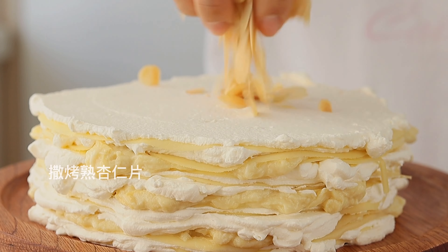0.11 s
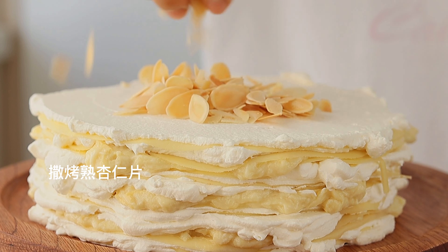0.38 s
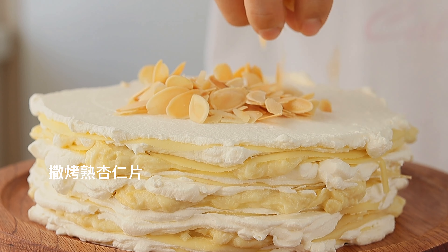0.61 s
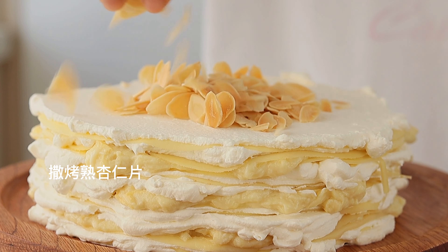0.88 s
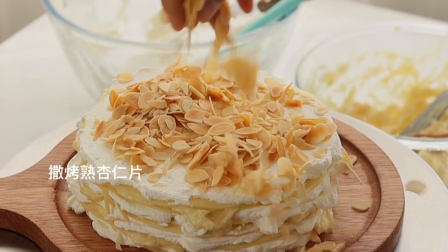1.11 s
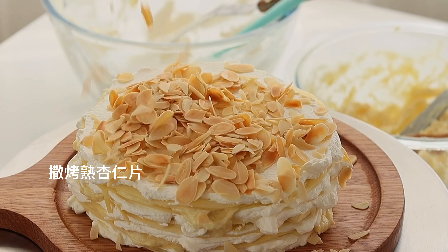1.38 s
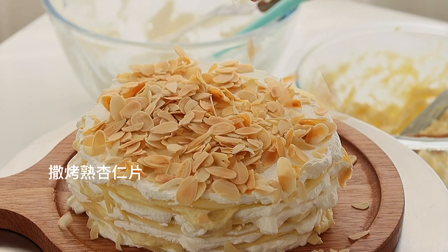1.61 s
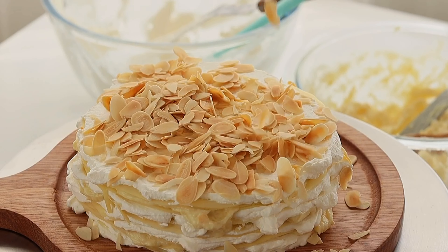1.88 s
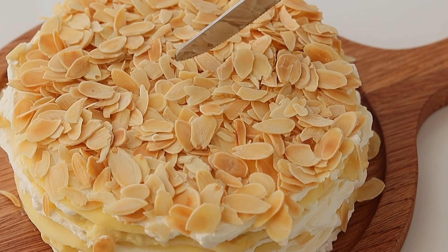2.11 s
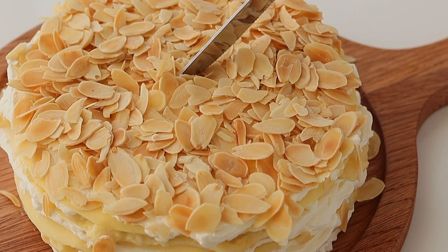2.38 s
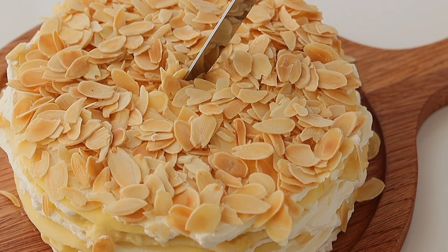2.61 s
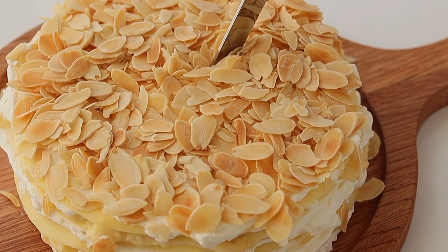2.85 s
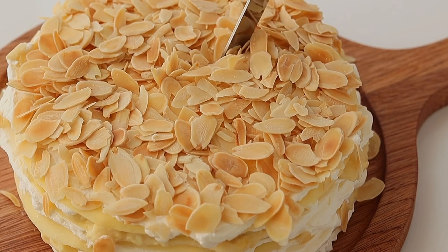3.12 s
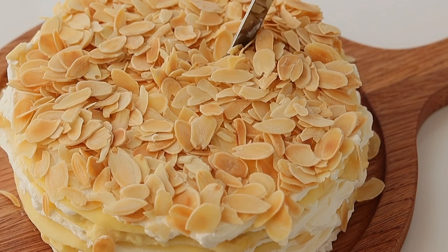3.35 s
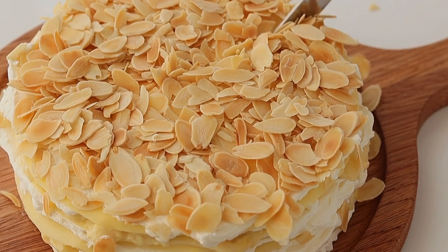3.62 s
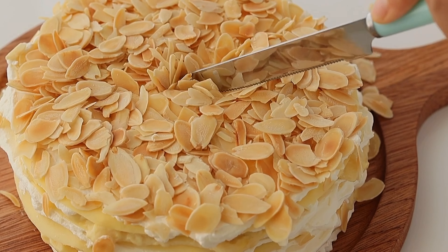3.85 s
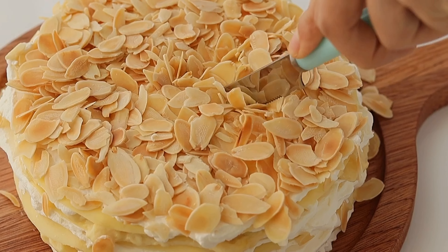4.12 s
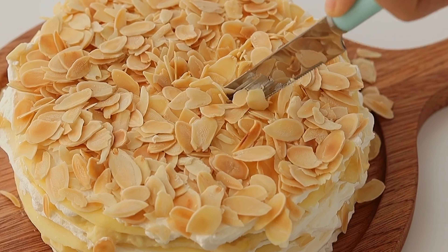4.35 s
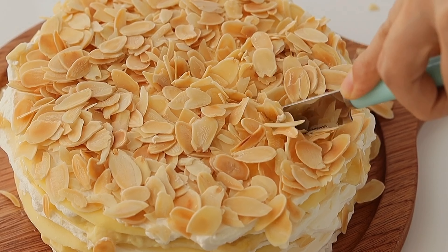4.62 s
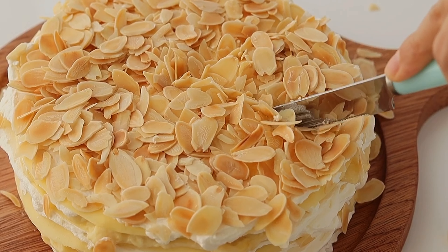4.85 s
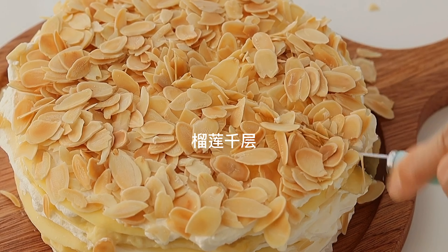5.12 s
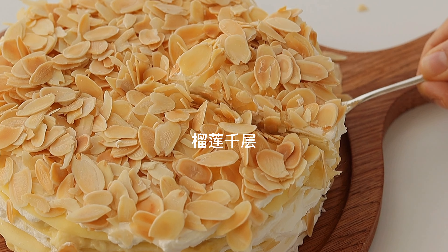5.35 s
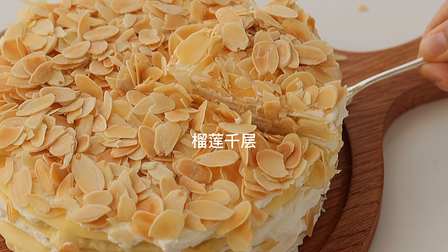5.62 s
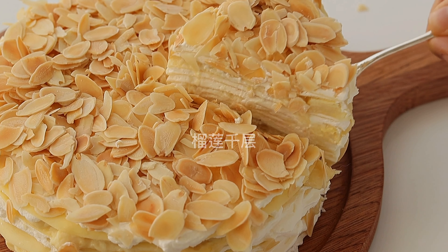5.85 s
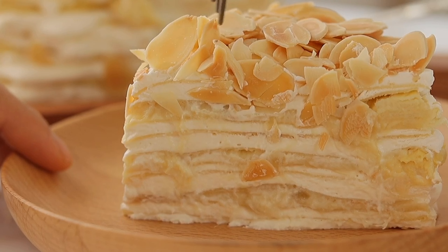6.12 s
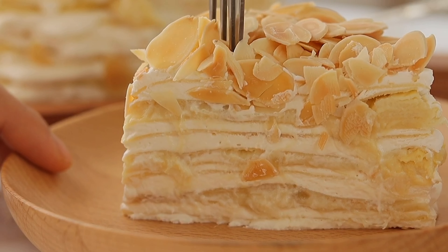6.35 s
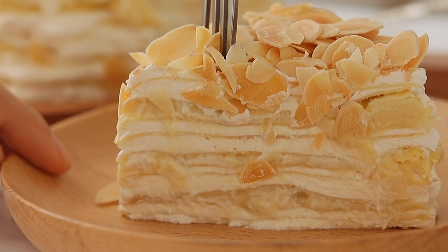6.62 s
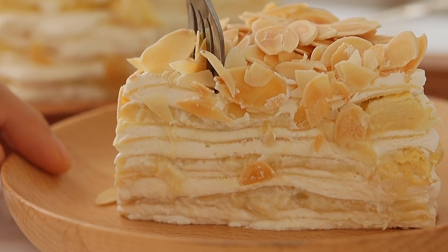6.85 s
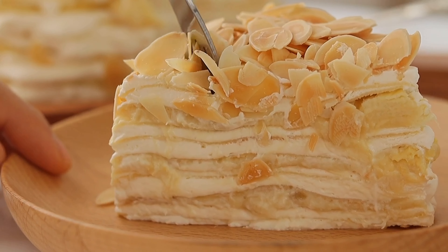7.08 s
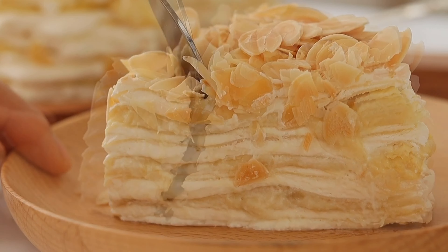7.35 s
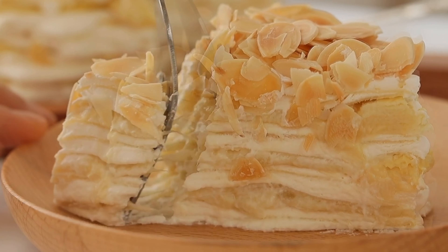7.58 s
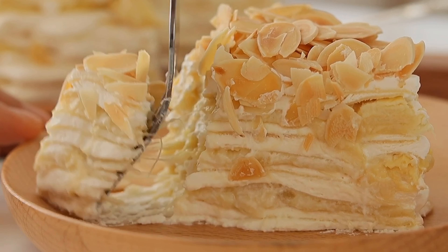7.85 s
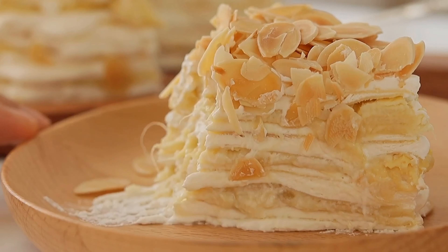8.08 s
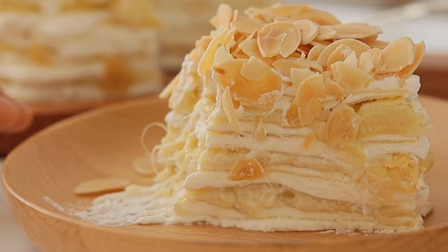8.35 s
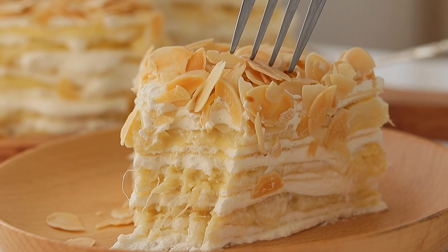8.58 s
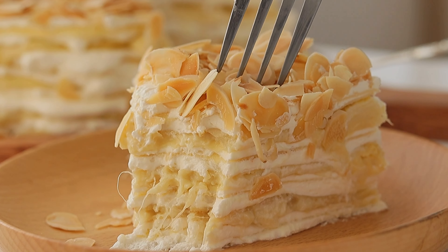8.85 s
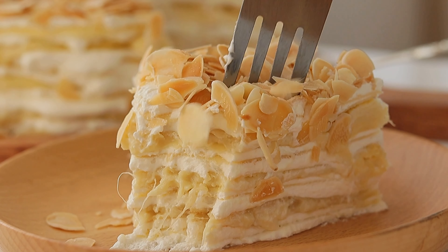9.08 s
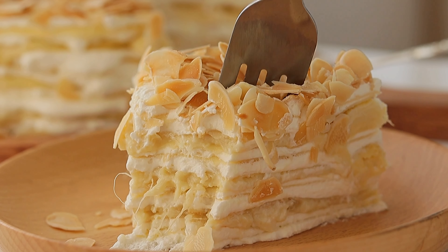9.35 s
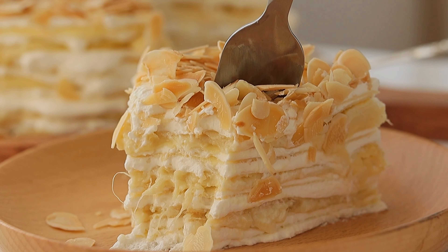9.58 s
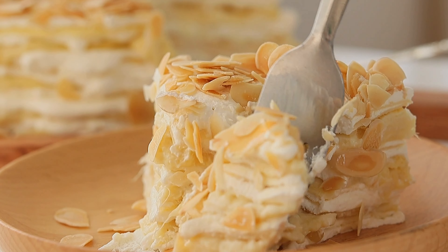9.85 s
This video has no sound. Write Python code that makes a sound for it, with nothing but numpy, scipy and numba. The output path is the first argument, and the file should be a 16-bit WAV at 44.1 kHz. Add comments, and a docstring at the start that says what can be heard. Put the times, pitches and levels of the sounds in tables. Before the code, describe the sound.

A small quiet kitchen, heard very close, with faint hiss and low hum. From 0.2 to 0.9 s a handful of toasted almond flakes patters onto a cream cake, dry and papery, with a light glass ting near 0.6. From 1.1 to 1.9 s a fuller shower crackles densely, with more body and another tiny ting near 1.45; a split-second dropout occurs at 1.1. A knife gives sparse snaps from 2.4, then crisp crunches that peak at 4.0-4.7, over soft low pressing rumbles, ending in a dull tap at 5.0 and small crumbles. Near quiet from 5.3 to 6.4, with a barely audible airy swish at 5.7. A fork crunches at 6.6, knocks the wooden plate at 7.36 and snaps brightly at 7.65. Quiet again, then sharp cracks at 8.8-9.3, a softer plate knock at 9.57, and a faint scrape at 9.8 after a tiny dropout.

```python
"""Over faint hiss, toasted almond flakes snap and crackle as they are sprinkled on a layered cream cake; then knife
and fork crunch through it. Crackle is noise shaped by random fractures, snaps and clicks are short pitched ticks, the
cake is duller noise. The fork knocks the wooden plate and flakes ting on a glass rim: decaying modes. Narrow noises
swell and fade as rumbles, hums, scrapes and one airy swish. Low rumble follows the pressing blade; a small quiet
kitchen hums, hisses and returns short echoes."""
import sys
import numpy as np
from scipy import signal
from scipy.fft import rfft, irfft, next_fast_len
from scipy.io import wavfile
from scipy.ndimage import uniform_filter1d
from numba import njit

SR = 44100
rng = np.random.default_rng(int(sys.argv[2]) if len(sys.argv) > 2 else 0)


def generate_wav(signal):
    """Clip the signal to [-1, 1] and save it as 16-bit WAV at the path in sys.argv[1]."""
    frames = np.transpose(np.atleast_2d(signal))
    scaled = np.clip(frames, -1, 1) * 32767
    pcm = np.round(scaled).astype(np.int16)
    wavfile.write(sys.argv[1], SR, pcm)


def nominal_scale(level):
    """Amplitude ratio for a level in decibels (scalar or array-like)."""
    x = np.asarray(level, float) / 20
    return 10 ** x


N = 439236
T = np.arange(N) / SR
FIRST_CUT_S = 2.1  # loose heap before, cake under the blade after


def unit(x):
    """Scale to rms 1."""
    return x / np.sqrt(np.mean(x ** 2))


def colour(x, points):
    """Filter by (Hz, dB) points joined on a log-frequency axis."""
    hz, db = np.transpose(points)
    size = next_fast_len(N)
    f = np.maximum(np.arange(size // 2 + 1) * SR / size, 1)
    gain = nominal_scale(np.interp(np.log(f), np.log(hz), db))
    return irfft(rfft(x, size) * gain, size)[..., :N]


def walk(rate_hz):
    """Random levels held 1 / rate_hz and slewed twice; rms 1."""
    hold = int(SR / rate_hz)
    steps = np.repeat(rng.standard_normal(N // hold + 1), hold)
    return unit(uniform_filter1d(uniform_filter1d(steps, hold), hold)[:N])


@njit
def svf(x, hz, damp):
    """State-variable band-pass with a moving centre; damp = width / centre."""
    y, band, low = np.empty(len(x)), 0., 0.
    for i in range(len(x)):
        g = np.tan(np.pi * hz[i] / SR)
        v = (band + g * (x[i] - low)) / (1 + g * (g + damp))
        band, low, y[i] = 2 * v - band, low + 2 * g * v, damp * v
    return y


def add(out, s, shape):
    """Mix a short sound in at time s."""
    i = int(s * SR)
    out[i:i + len(shape)] += shape[:len(out) - i]


def ring(hz, t60_s, rise_s):
    """A mode that starts in rise_s and dies away; peak near 1."""
    t = T[:int(t60_s * SR) + 2]
    decay = np.exp(-np.log(1000) * t / t60_s)
    return (1 - np.exp(-t / rise_s)) * decay * np.sin(2 * np.pi * hz * t)


def grit(rate_hz, scatter_db, tail_s):
    """Random tiny fractures of very unequal size: noise bursts with a short tail, in mid and side."""
    sizes = nominal_scale(scatter_db * np.minimum(rng.exponential(size=N), 4))
    fractures = (rng.random(N) < rate_hz / SR) * sizes
    envelope = signal.lfilter([1], [1, -np.exp(-1 / (tail_s * SR))], fractures)
    return unit(envelope * rng.standard_normal((2, N)))


# Flakes tumbling or crumbling under blade and fork.
# Each row: start of full level in seconds, hold in seconds, crackle level in dB, body level in dB.
BOUTS = [(0.173, 0.073, -43.5, -58.5), (0.246, 0.071, -38.5, -52), (0.34, 0.1, -53, -73),
         (0.465, 0.0066, -41, -48), (0.494, 0.057, -47, -45), (0.632, 0.044, -45, -50),
         (0.688, 0.08, -54, -56), (0.794, 0.066, -47, -55.5), (0.9, 0.027, -42.5, -55),
         (1.04, 0.0063, -49.5, -54), (1.122, 0.11, -37.5, -42), (1.234, 0.078, -40, -29.5),
         (1.311, 0.07, -38, -37.5), (1.417, 0.0097, -30, -27), (1.467, 0.085, -38.5, -37),
         (1.551, 0.066, -39.5, -34), (1.647, 0.099, -51, -47), (1.771, 0.0023, -33, -31),
         (1.811, .11, -54.5, -51), (2.374, 0.0034, -51, -50), (2.43, 0.0045, -44, -46.5),
         (2.666, 0.0038, -52.5, -58.5), (2.744, 0.047, -36, -46), (2.774, 0.07, -50, -44.5),
         (3.132, 0.079, -53.5, -69), (3.208, 0.0043, -45.5, -47.5), (3.442, 0.058, -43, -49.5),
         (3.552, 0.016, -44.5, -53.5), (3.604, 0.025, -42.5, -57.5), (3.687, 0.032, -49.5, -59),
         (3.763, 0.0017, -33.5, -45), (3.924, 0.011, -41, -52), (3.996, 0.024, -34.5, -55),
         (4.061, 0.037, -35, -54), (4.097, 0.064, -45.5, -50), (4.325, 0.027, -53.5, -86),
         (4.452, 0.11, -60.5, -67.5), (4.544, 0.051, -37, -56), (4.579, 0.044, -35, -41.5),
         (4.674, 0.0053, -23, -37), (4.844, 0.0096, -37, -70), (4.977, 0.066, -35.5, -54.5),
         (5.074, 0.062, -46, -63), (5.133, 0.09, -53, -68.5), (5.705, 0.21, -64.5, -87),
         (6.48, 0.14, -59, -75), (6.642, 0.0026, -43, -36.5), (6.668, 0.092, -44, -52.5),
         (6.791, 0.079, -55.5, -63.5), (7.146, 0.1, -60.5, -64.5), (7.286, 0.082, -56, -61),
         (7.364, 0.01, -47, -56), (7.4, 0.17, -66, -53), (7.605, 0.031, -48, -44.5),
         (7.668, 0.039, -67, -40.5), (7.865, 0.039, -58.5, -72), (8.768, 0.013, -41.5, -52),
         (8.935, 0.029, -31.5, -41.5), (9.091, 0.0058, -31.5, -33.5), (9.259, 0.0027, -33, -57),
         (9.344, 0.018, -49.5, -87), (9.536, 0.052, -54, -47), (9.831, 0.051, -54, -57)]


def bouts():
    """Gain of crackle and of body: every bout swells, holds and dies away; powers add."""
    # seconds per 20 dB; the loose heap trickles on longer than the cake
    attack_s, heap_release_s, cake_release_s = 0.016, 0.079, 0.036
    power = np.zeros((2, N))
    for s, hold_s, crackle_db, body_db in BOUTS:
        near = slice(max(int((s - .2) * SR), 0), int((s + hold_s + .5) * SR))
        release_s = heap_release_s if s < FIRST_CUT_S else cake_release_s
        early_s = s - T[near]
        late_s = np.maximum(T[near] - s - hold_s, 0)
        below_db = 20 * np.maximum(early_s / attack_s, late_s / release_s)
        power[:, near] += nominal_scale(np.array([[crackle_db], [body_db]]) - below_db) ** 2
    return np.sqrt(power)


# Pitch of each handful or stroke, set by what breaks.
# Each row: time in seconds, crackle centre in Hz, body centre in Hz, body resonance in dB.
PITCH = [(0.261, 9100, 1352, 14.5), (0.5, 3950, 1810, 7), (0.8, 8070, 1550, 1), (1.253, 4790, 1688, -8.5),
         (1.771, 6580, 1150, -11), (2.4, 8640, 640, -1), (2.778, 8440, 429, 2.5), (3.2, 8740, 1967, 1.5),
         (3.45, 8860, 501, 2), (3.75, 10780, 1715, 4), (4.102, 9940, 1432, 8.5), (4.6, 11780, 1340, 4),
         (4.859, 7450, 1622, 12.5), (4.999, 12060, 1074, -7.5), (5.169, 12730, 1715, 5.5),
         (5.849, 11010, 2180, 3), (6.659, 6570, 2029, 9), (7.339, 7230, 614, -4), (7.701, 12040, 687, -3),
         (8.848, 10380, 672, 0), (9.086, 13100, 1279, 3), (9.268, 7350, 1824, -2), (9.87, 5450, 1530, -2)]
# Body colour of the heap of falling flakes. Each row: frequency in Hz, gain in dB.
HEAP_COLOUR = [(110, -41.5), (280, -18), (1100, -9.5), (1900, -8), (3200, -10), (5000, -31)]
# Body colour of cake and board under the blade. Each row: frequency in Hz, gain in dB.
CAKE_COLOUR = [(200, -18.5), (565, 1), (2200, -9.5), (4500, -38.5)]


def crunch():
    """Dense fractures: a broad crackle, a band that moves with flake size, and the dull body they shake."""
    crackle_gain, body_gain = bouts()
    when, crackle_centre, body_centre, resonance_db = np.transpose(PITCH)
    bout = np.searchsorted((when[1:] + when[:-1]) / 2, T)  # nearest row
    # flakes differ: pitch wanders, scatter as 20 log10 of the ratio
    crackle_hz = np.clip(crackle_centre[bout] * nominal_scale(1.8 * walk(60)), 300, 16000)
    body_hz = np.clip(body_centre[bout] * nominal_scale(.4 * walk(60)), 300, 16000)

    rustle = grit(rate_hz=1600., scatter_db=3.4, tail_s=.001)
    ticks = grit(rate_hz=120., scatter_db=2.4, tail_s=.0015)
    fine = rustle + .95 * ticks
    broad = unit(colour(fine, [(1200, -18.5), (3000, 0.0), (8000, 3.0), (16000, 1.5)]))
    band = unit(np.array([svf(row, crackle_hz, .4) for row in fine]))
    crackle = unit(broad + nominal_scale(-2.0) * band)

    coarse = 1.6 * fine + grit(rate_hz=360.0, scatter_db=1.5, tail_s=0.0025)
    heap, cake = unit(colour(coarse, HEAP_COLOUR)), unit(colour(coarse, CAKE_COLOUR))
    body = np.where(T < FIRST_CUT_S, heap, cake)
    resonance = unit(np.array([svf(row, body_hz, .18) for row in body]))
    body = unit(body + nominal_scale(resonance_db[bout]) * resonance)
    return crackle_gain * crackle + body_gain * body


# Single ticks, loud or faint: flakes that snap or land, and small clicks of fork contact.
# Each row: time in seconds, tick level in dB, tick pitch in Hz, body level in dB.
SNAPS = [(0.2523, -17.5, 11900, -37), (0.295, -15, 14400, -36), (0.4672, -22.5, 4840, -30),
         (0.4877, -18.5, 4680, -21.5), (0.5171, -12.5, 5700, -18.5), (1.1487, -18.5, 4150, -38),
         (1.1675, -13, 7900, -25), (1.1926, -19, 12700, -33), (1.2203, -12, 10600, -33),
         (1.231, -15, 9500, -46), (1.241, -13, 10200, -33), (1.247, -27, 3000, -22),
         (1.261, -14, 4020, -18), (1.281, -8.5, 5750, -11), (1.31, -16.5, 3000, -33),
         (1.322, -16, 7200, -27), (1.343, -15.5, 9000, -28), (1.3972, -16, 14000, -36),
         (1.4203, -9, 11400, -24), (1.43, -14.5, 3350, -21), (1.4765, -11.5, 9000, -21),
         (1.558, -17.5, 4040, -40), (1.583, -14.5, 6000, -27), (1.589, -10.5, 8600, -23),
         (1.611, -15.5, 10200, -35), (1.698, -26, 4470, -37), (1.7227, -30, 4700, -36),
         (1.738, -10, 13500, -64), (1.763, -11.5, 5240, -17.5), (1.926, -28.5, 13100, -57),
         (2.3716, -20, 12200, -33), (2.4332, -14.5, 8580, -26.5), (2.5656, -38, 13200, -46.5),
         (2.7183, -26.5, 9500, -62), (2.751, -11.5, 7500, -34), (2.7983, -19, 13000, -43),
         (3.2182, -27, 2100, -42), (3.2709, -29.5, 8200, -48), (3.4643, -14, 7950, -40),
         (3.4795, -18.5, 8000, -27), (3.5231, -24, 6900, -36), (3.555, -23, 5800, -49),
         (3.6189, -14.5, 12400, -42), (3.772, -12, 8960, -42), (3.9651, -9.5, 9700, -26),
         (4.001, -23, 6800, -34), (4.054, -11, 12800, -56), (4.081, -11, 11000, -44),
         (4.0981, -6, 12200, -21.5), (4.1358, -12, 9500, -25.5), (4.3298, -29.5, 6900, -59),
         (4.5273, -15.5, 9600, -37), (4.565, -4.5, 12900, -19.5), (4.5931, -3, 8620, -42),
         (4.6127, -7.5, 13500, -26.5), (4.6553, -16, 10600, -42), (4.899, -31.5, 4740, -47),
         (4.978, -33, 12500, -35.5), (5.0132, -16, 11800, -44), (5.0274, -13.5, 13700, -56),
         (5.065, -14.5, 11590, -36), (6.5128, -30.5, 7700, -55), (6.6269, -9, 6750, -48),
         (6.6418, -10.5, 5200, -48), (6.6659, -19, 7300, -30), (6.684, -21, 7000, -43),
         (6.717, -23.5, 8500, -42), (6.8233, -27, 4930, -50), (7.0588, -38.5, 5500, -46),
         (7.208, -36, 6960, -62), (7.327, -11.5, 7200, -12.5), (7.3581, -13, 4500, -30),
         (7.6091, -14, 12400, -30), (7.6483, -2, 11850, -13.5), (7.6593, -3.5, 12800, -16),
         (8.766, -11.5, 7800, -23.5), (8.9485, -2, 11300, -24), (9.0917, -7, 12700, -22.5),
         (9.0965, -2.5, 10900, -7), (9.253, -16, 4370, -51), (9.262, -12.5, 9000, -58),
         (9.339, -24, 13000, -63), (9.5218, -31, 7050, -34.5), (9.572, -24.5, 3140, -48),
         (9.9402, -44, 4500, -53)]
# Body modes of the heap. Each row: nominal frequency in Hz, nominal level in dB, t60 in seconds.
HEAP_RING = [(1050, -4, 0.018), (1750, 4, 0.013), (3350, 0, 0.011)]
# Body modes of the cake. Each row: nominal frequency in Hz, nominal level in dB, t60 in seconds.
CAKE_RING = [(580, -4, 0.014), (760, -4, .011), (1430, -4, 0.009)]


def snaps():
    """Each snap or click: a few pitched cycles in a broad tick, a noise tail after it, a short body ring."""
    out, lead_s = np.zeros((2, N)), .001
    t = T[:SR // 40] - lead_s
    chance = rng.standard_normal((len(SNAPS), len(t) + 5))
    for (s, db, hz, body_db), row in zip(SNAPS, chance):
        in_heap = s < FIRST_CUT_S
        octaves = signal.butter(1, [hz / 2, min(2 * hz, 19000)], "band", fs=SR)
        hiss = 1.4 * unit(signal.lfilter(*octaves, row[5:]))
        swell = np.exp(-np.abs(t) * hz / np.where(t < 0, 1.2, 1.6))
        tick = swell * (np.cos(2 * np.pi * hz * t + row[0]) + nominal_scale(-12.0) * hiss)
        tail_s = 0.005 if in_heap else 0.0017
        tail = nominal_scale(-16) * hiss * (t > 0) * np.exp(-t / tail_s)
        tick = nominal_scale(db) * (tick / np.abs(tick).max() + tail)
        add(out[0], s - lead_s, tick)
        add(out[1], s - lead_s, 0.09 * row[0] * tick)  # a little off centre
        for (ring_hz, ring_db, t60_s), share in zip(HEAP_RING if in_heap else CAKE_RING, row[1:4]):
            level = nominal_scale(body_db + ring_db + 2 * share)
            add(out[0], s - .0004, level * ring(ring_hz * (1 + .06 * share), t60_s, rise_s=0.00091))
    # such small contacts send out no bass
    return signal.sosfilt(signal.butter(2, 260, "high", fs=SR, output="sos"), out)


def struck(hits, modes, rise_s, chatter_s, chatter_db):
    """Every blow rings the same modes; the contact chatters on and keeps stirring them."""
    out, t = np.zeros(N), T[:SR // 4]
    for s, db, free in hits:
        force = nominal_scale(chatter_db) * rng.standard_normal(len(t)) * np.exp(-t / (free * chatter_s))
        force[0] = -1
        blow = np.zeros(len(t))
        for hz, mode_db, t60_s in modes:
            add(blow, 0, nominal_scale(mode_db) * ring(hz, free * t60_s, rise_s))
        blow = signal.fftconvolve(blow, force)[:len(t)]
        add(out, s, nominal_scale(db) * blow / np.abs(blow).max())
    # small things send no deep bass
    return signal.sosfilt(signal.butter(2, 100, "high", fs=SR, output="sos"), out)


# Fork meets plate. Each row: time in seconds, level in dB, share of the free ring time.
KNOCKS = [(7.3578, -7, 1.), (9.5712, -11.5, .65)]
# Modes of the wooden plate. Each row: frequency in Hz, level in dB, free t60 in seconds.
PLATE = [(137, -19, .28), (195, -18, .24), (265, -17, .15), (313, -13, .18), (389, -17, .18),
         (459, -9, .12), (523, 1, .07), (590, -5, .04), (720, -13, .06), (795, -10, .09), (980, -7, .045),
         (1190, -8, .035), (1700, -13, .03), (2300, -13, .015)]


def knocks():
    """Fork blows ring the low, heavily damped modes of wood."""
    return struck(KNOCKS, PLATE, rise_s=.0002, chatter_s=.035, chatter_db=-36)


# Flakes on a glass rim. Each row: time in seconds, level in dB, share of the free ring time.
TINGS = [(.637, -22.5, 1.), (.889, -31, 1.), (1.455, -21, .8), (1.803, -33, 1.)]
# Modes of the glass. Each row: frequency in Hz, level in dB, free t60 in seconds.
GLASS = [(6355, -6, 0.1), (7090, -2, 0.093), (7915, 0, 0.092), (8790, -4, 0.06), (9650, -8, .05)]


def tings():
    """Light flakes ring the high modes of glass."""
    return struck(TINGS, GLASS, rise_s=0.00063, chatter_s=0.011, chatter_db=-26.0)


# Narrow noises that swell and fade: low rumbles, hums, scrapes and one high, airy swish.
# Each row: start in seconds, length in seconds, level in dB, band centre in Hz.
NARROW_NOISES = [(2.839, 0.06, -47.5, 41.6), (5.032, 0.052, -47.5, 141), (5.093, 0.13, -64.5, 1690),
                 (5.145, 0.078, -53.5, 94.6), (5.704, .25, -67, 10900), (6.791, .07, -50.5, 40.5),
                 (7.561, 0.13, -50.5, 313), (7.761, 0.063, -60.5, 312), (9.264, 0.084, -63, 208),
                 (9.82, 0.065, -58.5, 299), (9.824, 0.14, -56, 533), (9.831, 0.068, -70, 1530),
                 (9.853, 0.08, -58.5, 210)]


def narrow_noises():
    """Noise through one narrow resonance swells and fades; its centre sets rumble, hum, scrape or swish."""
    out = np.zeros(N)
    sources = rng.standard_normal((len(NARROW_NOISES), SR // 2))
    for (s, length_s, db, hz), noise in zip(NARROW_NOISES, sources):
        t = T[:int(length_s * SR)]
        band = svf(noise, np.full(len(noise), 1. * hz), .07)[-len(t):]  # skips the build-up
        add(out, s, nominal_scale(db) * unit(band) * np.sqrt(np.sin(np.pi * t / length_s)))
    return out


# Dull contacts of blade and fork with cake and board.
# Each row: time in seconds, level in dB, mode in Hz.
TAPS = [(4.979, -20.5, 2280), (5.144, -39, 850), (6.567, -32.5, 612), (6.666, -25, 655), (9.097, -16, 652)]


def taps():
    """A soft contact rings one mode for about eleven cycles."""
    out = np.zeros(N)
    for s, db, hz in TAPS:
        add(out, s, nominal_scale(db) * ring(hz, 11.4 / hz, rise_s=0.00046))
    return out


# Pressure of hand and blade passed on through the table.
# Each row: centre in seconds, level in dB, spread in seconds.
PUSH = [(2.78, -48.5, 0.033), (2.857, -50.5, 0.025), (3.229, -55, 0.036), (3.48, -50, 0.025),
        (3.771, -54.5, 0.02), (4.17, -50, 0.034), (4.579, -52, 0.05), (5.12, -59, 0.083),
        (7.678, -52, 0.066)]


def push():
    """Low rumble of the table while the blade bears down."""
    rumble = colour(rng.standard_normal(N), [(15, -10.0), (35, 6.5), (130, -5.0), (300, -2.5), (600, -29.0)])
    load = sum(nominal_scale(db) * np.exp(-.5 * ((T - s) / spread_s) ** 2) for s, db, spread_s in PUSH)
    return load * unit(rumble)


def echoes(x, t60_s, db):
    """Diffuse return of nearby surfaces: decaying noise of total gain db."""
    t = T[:int(t60_s * SR)]
    tail = rng.standard_normal(len(t)) * np.exp(-np.log(1000) * t / t60_s)
    return nominal_scale(db) * signal.fftconvolve(x, tail / np.sqrt(np.sum(tail ** 2)))[:N]


# Colour of the hiss. Each row: frequency in Hz, gain in dB.
ROOM_COLOUR = [(25, -11.5), (85, -22.5), (130, -25), (450, -32.5), (531, -19.5), (660, -24.5), (4740, -34),
               (16000, -32)]
# Background level. Each row: time in seconds, level in dB.
ROOM_LEVEL = [(0, -61.5), (2.02, -67), (5.3, -65), (6.4, -62.5), (9.96, -65)]


def room():
    """Slowly drifting hiss, wide in the treble, and a low hum that wavers."""
    hum_hz, hum_db = 205.8, -17  # dB against the hiss
    mid, side = unit(colour(rng.standard_normal((2, N)), ROOM_COLOUR))
    side = colour(side, [(100, -8.5), (1000, -6), (5000, -5.0)])
    hum = unit(svf(rng.standard_normal(N), np.full(N, hum_hz), 0.014))
    hum = nominal_scale(hum_db + 0.92 * walk(9.8)) * hum
    level_db = np.interp(T, *np.transpose(ROOM_LEVEL)) + 0.17 * walk(2.9)
    return nominal_scale(level_db) * np.array([mid + hum, side])


# The sound drops out briefly. Each row: start in seconds, end in seconds.
GAPS = [(1.107, 1.1155), (9.812, 9.822)]


def dropouts():
    """Gain that falls to silence in each gap, with 2 ms ramps."""
    silent = sum((T > start) & (T < end) for start, end in GAPS)
    return uniform_filter1d(1. - silent, SR // 500)


def scene():
    """Blows are centred; the crunch is spread over the cake and so a little wide in the treble."""
    mid, side = crunch()
    side = colour(side, [(300, -25), (1200, -17), (2500, -19), (5000, -11), (12000, -7)])
    mid = mid + knocks() + narrow_noises() + taps() + tings()
    mid, side = np.array([mid, side]) + snaps()
    mid = mid + echoes(mid, t60_s=.15, db=-15)
    mid, side = np.array([mid + push(), side]) + room()
    mid, side = np.array([mid, side]) * dropouts()
    return np.array([mid + side, mid - side])


def roll_off(x):
    """The treble ends steeply here."""
    return signal.sosfilt(signal.butter(12, 16980, fs=SR, output="sos"), x)


def record(dry):
    """The microphone path ends below 16 kHz and clips at full scale."""
    lowpass = signal.ellip(8, .2, 35, 15800, fs=SR, output="sos")
    mix = np.clip(signal.sosfilt(lowpass, dry), -1, 1)
    return roll_off(mix)


dry = scene()
out = record(dry)
generate_wav(out)
```